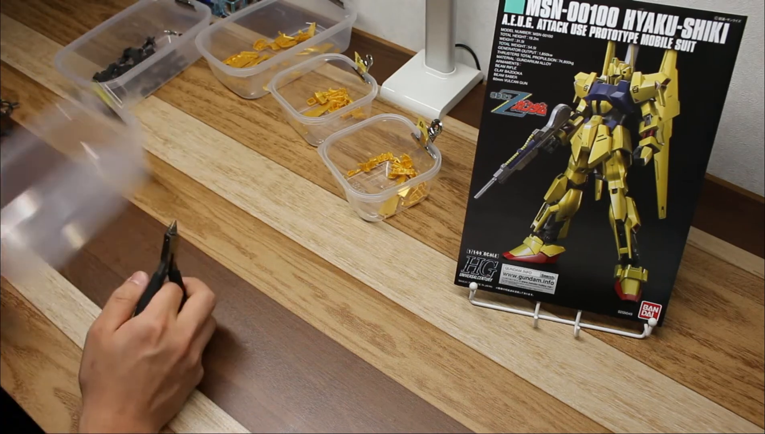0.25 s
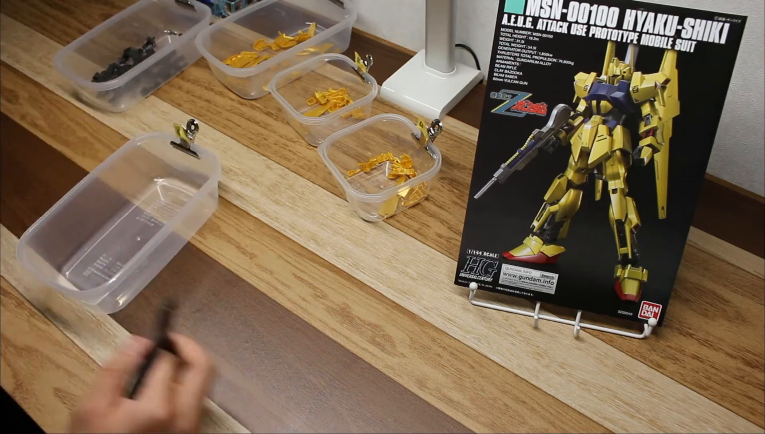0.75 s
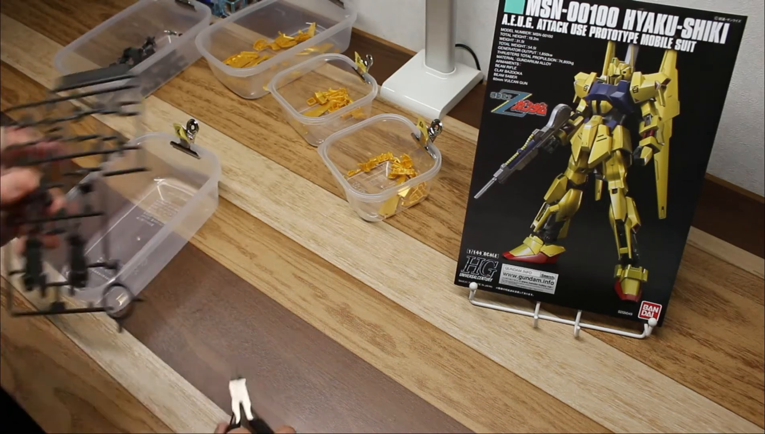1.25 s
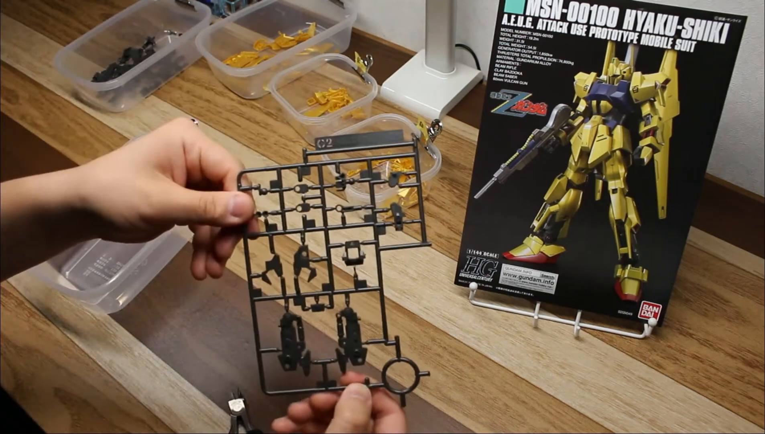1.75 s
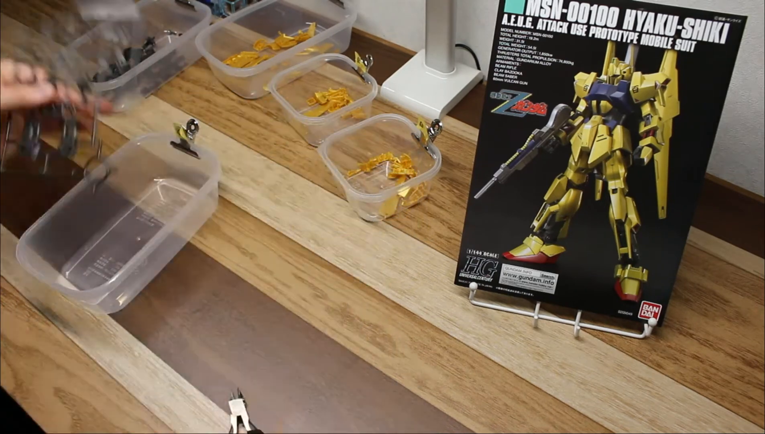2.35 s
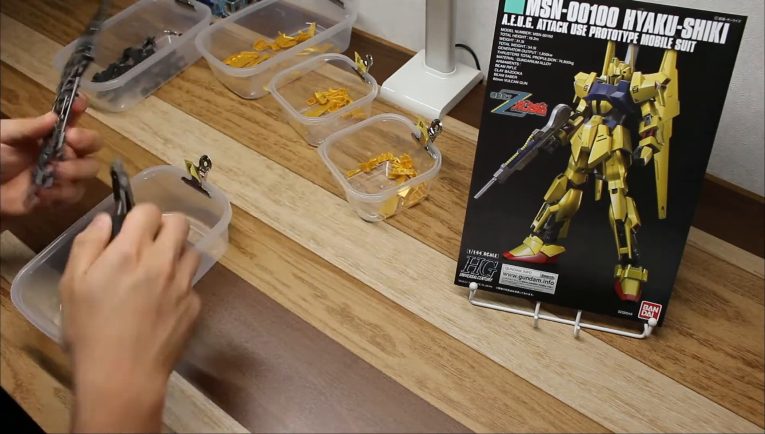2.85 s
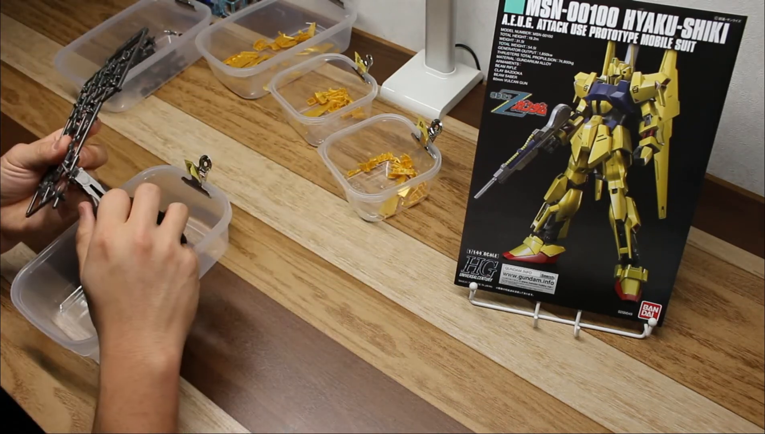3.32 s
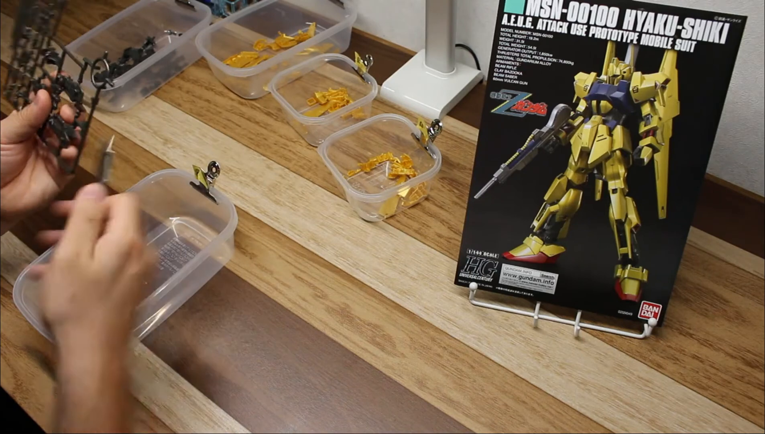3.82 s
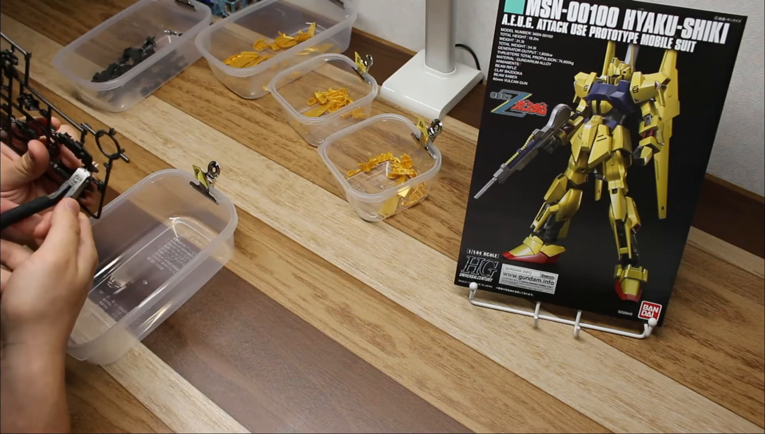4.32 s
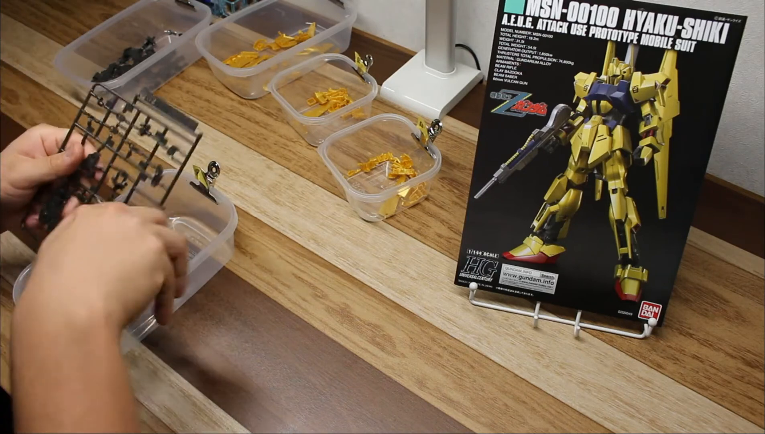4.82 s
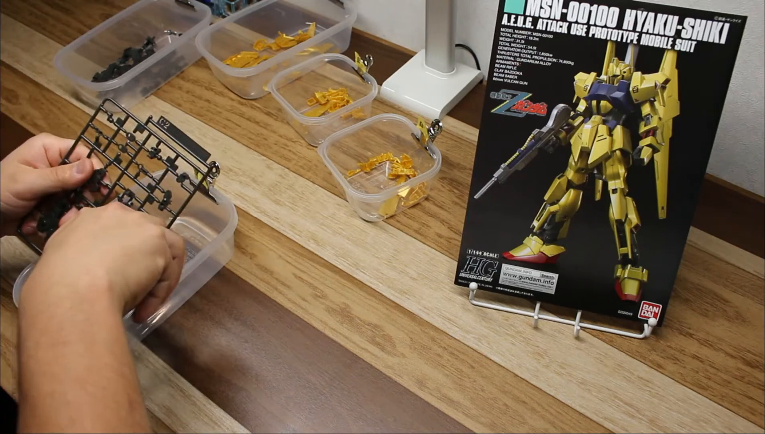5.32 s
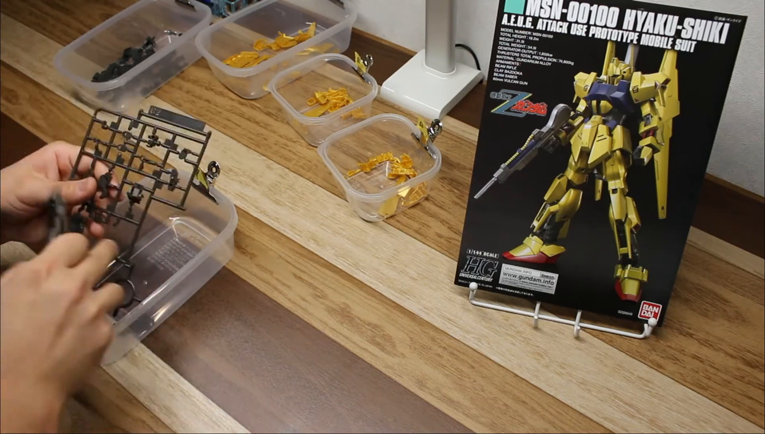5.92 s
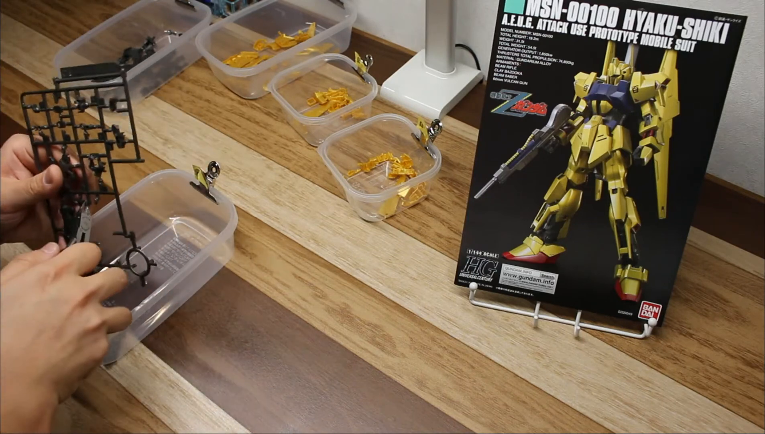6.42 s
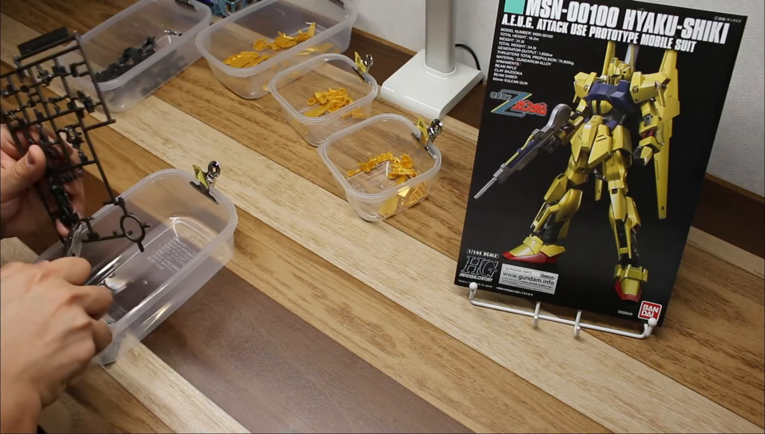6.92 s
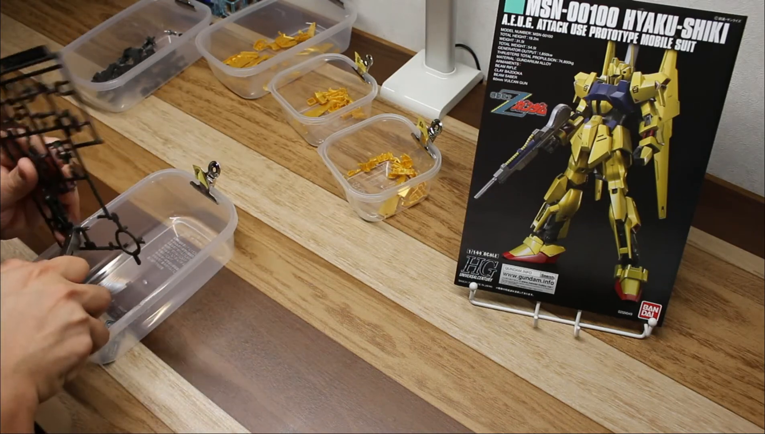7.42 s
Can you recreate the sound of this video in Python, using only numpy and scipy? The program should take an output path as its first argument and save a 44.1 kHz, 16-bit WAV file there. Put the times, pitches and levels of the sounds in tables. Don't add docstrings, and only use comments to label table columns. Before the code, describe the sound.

At a hobby desk, an empty tub bumps and rings briefly, loose plastic pieces chatter, then a loud double knock lands. After a near-silent gap, a metal tool clacks sharply. Quiet handling follows, with dry skin rustles, dull desk thuds and tiny jaw clicks. A light plastic frame strikes hard and drags shortly, before a final clear snip. Close, dry stereo with soft hiss.

```python
import sys
import numpy as np
from scipy import signal
from scipy.fft import rfft, irfft
from scipy.io import wavfile
from scipy.ndimage import uniform_filter1d

SR = 44100
rng = np.random.default_rng(int(sys.argv[2]) if len(sys.argv) > 2 else 0)


def transcribe(signal):
    frames = np.atleast_2d(signal).T
    limited = np.clip(frames, -1, 1)
    pcm = np.round(limited * 32767).astype(np.int16)
    wavfile.write(sys.argv[1], SR, pcm)


def elevation(decibels):
    levels = np.asarray(decibels, float)
    return 10 ** (levels / 20)


N = 337806

# start_s, level_db, hardness_db, fade_s
TUB_BLOWS = [
    (.0855, -20.5, 5.5, 0.014),
    (.4932, -22, 2.5, 0.059),
    (1.1605, -28.5, 1, 0.01),
    (1.196, -27.5, -3.5, 0.014),
    (1.2525, -25, 0.9, 0.016),
    (1.3805, -11, -4.5, 0.035),
    (1.4257, -10, -1.5, 0.026),
    (2.4461, -41, 3, 0.032),
]
TUB_KNOCKS = [(0.071, -25, -3.5, 0.069), (0.088, -43.5, 10, 0.067), (0.417, -20, -0.4, 0.083),
              (0.445, -39, 4, 0.13), (0.505, -21.5, 3, 0.066), (0.688, -38, 8, 0.059),
              (1.372, -35, -1.5, 0.13), (1.388, -40.5, 9, 0.054), (1.419, -22.5, -13.5, 0.13),
              (1.434, -23, -0.1, 0.052), (1.475, -35.5, -10.5, 0.0785), (2.452, -54.5, 6.5, 0.12),
              (2.49, -48.5, 5.5, 0.38), (2.585, -40.5, 6, 0.08), (5.68, -52, 3.5, 0.067),
              (6.86, -54, 4.5, 0.18)]
TUB_TICKS = [(.4145, -26, 0, 0.023), (.4885, -30, 5, 0.021), (.503, -31, 3, 0.019), (0.75, -38.5, 4, .02),
             (1.3832, -13.5, 2, .02), (1.4277, -14, -0.5, 0.024), (0.49, -41, 0, .03), (2.3, -42, -3, .02),
             (.0812, -26, 0, .015), (.0875, -25, 0, .025), (2.455, -43, -2, .04), (2.515, -45, 0, .04),
             (2.565, -40, 2, .02), (1.366, -36, 0, .02)]
PART_RATTLES = [
    (1.125, -37.5, -4, 0.28),
    (1.16, -26.5, -0.8, 0.075),
    (1.195, -24.5, 0.2, 0.086),
    (1.252, -21, 0.4, 0.063),
    (1.543, -56, 6.5, 0.21),
    (1.699, -50, 1.5, 0.067),
]
PART_TICKS = [(.366, -45.5, -3.5, 0.027), (.7075, -39, 0, .012), (1.119, -47, -1, .02),
              (1.1615, -30, 1, .01), (1.1965, -28, 1, .01), (1.2535, -26, 1, .01),
              (1.1305, -39.5, -2, .015), (1.1575, -33, 0, .012), (1.1905, -32.5, -0.5, .012),
              (1.2485, -30, 0.5, .012), (1.275, -39, 2.5, 0.11), (2.5545, -45, 2, .015),
              (2.585, -54, -3, 0.069)]
FRAME_BLOWS = [
    (6.0113, -10, 3.7, 0.017),
    (6.0549, -14, 2.5, 0.02),
    (6.0795, -26, 3, 0.018),
]
FRAME_KNOCKS = [
    (0.76, -40.5, 6.6, 0.05),
    (0.788, -42, 7, 0.02),
    (2.56, -44.5, 7.9, 0.16),
    (2.61, -46.5, 1.1, 0.075),
    (5.995, -31, 0.033, 0.12),
    (6.003, -28.5, 10.5, 0.14),
    (6.017, -23.5, 3.5, 0.025),
    (6.032, -46.5, 20, 0.11),
    (6.063, -32, 5.3, 0.08),
]
FRAME_SCRAPE = [
    (6.075, -30, 11.5, 0.12),
    (6.09, -37, 11.5, 0.054),
    (6.105, -29.5, 1, 0.12),
    (6.12, -30, -1, 0.12),
    (6.14, -43, -11.5, 0.055),
    (6.16, -42, -2, 0.042),
]
FRAME_TICKS = [(.7855, -44, 4, .012), (5.987, -41.5, -7.5, .04), (5.9975, -31.5, -4, .02),
               (6.0015, -31, -2, .015), (6.02, -30, 8, .012), (6.0745, -33, 4, .015),
               (6.1, -33.5, 3.5, .015), (6.0085, -22, -1, .012), (6.066, -36, 6, .05),
               (5.4255, -54, 4, .01), (6.118, -33, -2, .015), (6.13, -35, -2, .015)]
THIN_WALL_KNOCKS = [
    (.42, -29, -3, .05),
    (.502, -30, 4, .06),
    (.747, -48, 4, .04),
    (.757, -40, 2, .04),
    (.766, -38, -1, .045),
    (.786, -42, 7, .018),
    (2.565, -43.5, 1, .08),
    (2.583, -43, 2, .1),
]
TOOL_RATTLES = [
    (0.374, -43, -2, 0.26),
    (0.59, -30.5, 1.4, 0.06),
    (0.654, -32, 1.3, 0.048),
    (0.708, -41.5, -1.5, 0.04),
]
CLACK_BLOWS = [
    (2.2352, -22, 0.1, 0.017),
    (2.24, -20.5, 0.1, 0.011),
]
CLACKS = [
    (2.226, -38, -1.7, 0.13),
    (2.243, -34, -2.1, 0.077),
    (2.316, -52, 9, 0.04),
]
PICKUPS = [
    (2.899, -44.5, 2.5, 0.044),
    (3.576, -43.5, 0.5, 0.093),
    (3.595, -66, -6, 0.092),
]
SNIPS = [
    (0.0779, -36, -2, 0.022),
    (0.9946, -37, 11, 0.014),
    (2.4807, -44.5, -6, 0.0099),
    (4.5662, -28.5, 2, 0.013),
    (5.0333, -53.5, -9.5, 0.017),
    (5.428, -47, -8.5, 0.011),
    (5.9781, -42, 8.5, 0.014),
    (7.4371, -25, 1.5, 0.013),
    (7.5095, -51.5, 6, 0.028),
]
# start_s, level_db, hardness_db
SQUEEZES = [
    (0.997, -47.5, 0.5),
    (4.557, -47, 0),
    (4.571, -48, 1),
    (5.036, -66, -10),
    (5.43, -60, -8.5),
    (5.98, -54, -0.5),
    (7.429, -44, 5),
    (7.442, -44.5, 4.5),
]
# start_s, level_db, hardness_db
BRUSHES = [(1.053, -51, 2.5), (2.196, -59.5, 0), (2.548, -51, -2), (2.697, -57.5, 3), (2.787, -54.5, 0.5),
           (2.856, -49.5, 2), (2.877, -55, 0), (3.039, -61, -1.3), (3.724, -57, -2.5), (3.82, -63, -1),
           (4.769, -53.5, 1.6), (4.857, -59, -0.6), (5.222, -67, -1.5), (5.499, -73.5, -3),
           (5.612, -67, -1.5), (5.962, -52.5, 1), (6.836, -55, 0), (7.1, -66.5, -2), (7.535, -55.5, -0.5)]
# start_s, level_db, pitch_hz, fade_s
THUDS = [(0.08, -31, 168, 0.038), (0.415, -27, 126, 0.11), (0.496, -32, 143, 0.09),
         (0.682, -36.5, 61.9, 0.041), (1.157, -40.5, 130, 0.16), (1.248, -34.5, 158, 0.03),
         (1.385, -29, 124, 0.1), (1.425, -28.5, 110, 0.13), (2.231, -39.5, 148, 0.075),
         (2.448, -40, 230, 0.082), (2.567, -38.5, 128, 0.17), (2.896, -42.5, 71.6, 0.055),
         (3.575, -51.5, 62.5, 0.15), (3.72, -40.5, 126, 0.094), (3.742, -38.5, 76, 0.1),
         (4.567, -54, 87.4, 0.11), (5.68, -53.5, 110, 0.11), (6.011, -36.5, 50, 0.024),
         (6.859, -53.5, 139.7, 0.1)]

# pitch_hz, width_hz, level_db
TUB = [(280, 45, -9), (385, 53.7, 2.5), (482, 84, -2), (639.7, 76, -4.5), (753, 45, -5), (948, 50, -4),
       (1172, 50, -13.5), (1400, 110, -12), (2030, 290, -20), (3150, 500, -23), (5124, 640, -28),
       (7400, 1500, -30)]
LOOSE_PARTS = [(580, 78, -14), (1077, 78, -10), (1600, 170, -3.5), (1816, 100, -0.5), (3120, 1400, -12),
               (3460, 24, 3), (3107, 35, -4.5), (4950, 97, -0.5), (5480, 300, -9.5), (7690, 380, -5.5),
               (9090, 300, -11.5), (12020, 6100, -28)]
FRAME = [(498, 160, -13.5), (1056, 180, -3.5), (1236, 120, 0.5), (1690, 310, 10), (3070, 1120, -4),
         (3115, 150, -14), (1972, 250, -1), (5120, 630, -4), (5780, 290, -6.5), (6670, 760, -13.5),
         (8356, 960, -20), (11700, 6000, -17)]
THIN_WALL = [(927, 130, -1), (1500, 200, -3), (1900, 160, -5), (2760, 90, -5), (5250, 250, -11),
             (7000, 900, -15)]
TOOL = [(307, 260, -13.5), (646, 180, -1.5), (1860, 280, 3.5), (4410, 120, 2.5), (5850, 520, -7),
        (7740, 590, -2.5), (10800, 5500, -10)]
TRAY = [(326, 93, -4), (598, 110, 3.5), (1730, 250, 7.5), (3400, 420, -1.5), (4080, 210, -2.5),
        (4960, 160, 2), (5650, 170, -5), (8800, 440, -21)]
HANDLES = [(358, 310, -19), (2047, 236, -5.5), (4290, 290, -7.5), (4960, 330, -5), (7060, 510, -7.5),
           (8070, 240, 2.5), (12300, 2900, -7)]
JAWS = [(500, 500, -6), (1687, 540, -1), (2152, 270, 3), (3000, 950, -0.5), (4140, 540, 1.5),
        (5340, 380, 8), (6820, 350, 2.5), (8180, 980, -0.5), (10555, 500, -11), (11570, 200, 0),
        (14240, 1100, -19.5)]
SKIN = [(360, 690, 9), (780, 980, 10.5), (2010, 510, 16), (4772, 1400, 11), (7610, 3600, 1.5),
        (11430, 1774, 9.5), (13620, 9700, -2)]

RANGE_EDGES_HZ = [150, 1300, 2800, 6500, 20000]
TUB_LIFT = (0, 1.049, 2.049, 3.001)
PARTS_LIFT = (-2, -0.9, -0.11, 1.37)
FRAME_LIFT = (0.66, 0, 1.01, 1.16)
# level_db at hardness 0 in each range low to top, then its lift as above
TUB_BLOW_TONE = ((1, -17, -25.5, -29.5), TUB_LIFT)
TUB_TONE = ((-1, -10.5, -19, -29), TUB_LIFT)
RATTLE_TONE = ((-3.5, -3.5, 0, -10.5), PARTS_LIFT)
FRAME_BLOW_TONE = ((-8, -0.5, -6.5, -11.5), FRAME_LIFT)
FRAME_TONE = ((-6.5, -0.5, -10.5, -15), FRAME_LIFT)
SCRAPE_TONE = ((-10, 0, -10.5, -18), (-0.24, 0, 1.06, 1.5))
TOOL_TONE = ((-4.5, -5, -1, -13.5), PARTS_LIFT)
CLACK_BLOW_TONE = ((1, -7, -1.5, -21), PARTS_LIFT)
CLACK_TONE = ((-5.5, -9, 2, -13.5), PARTS_LIFT)
PICKUP_TONE = ((-7, 0.8, 0, -5.5), PARTS_LIFT)
JAW_TONE = ((-16.5, -6, 0.0052, 0.1), (-1.5, -0.82, 0.00067, 0.58))
SQUEEZE_TONE = ((-15.5, -8.5, -0.5, 0), JAW_TONE[1])
SKIN_TONE = ((-4, -6.5, -4.5, 0.0011), (-4.5, -1.5, -0.9, 0.0032))

# start_s, level_db
BUSY = [(0, -35), (.1, -34), (.22, -50), (.33, -49.5), (.5, -46), (.76, -43), (.87, -68), (1.19, -48),
        (1.381, -61.5), (2.201, -65.5), (2.69, -54.5), (3.43, -72.5), (3.73, -61), (4.97, -76), (5.89, -79),
        (6.119, -68), (7.3, -76.5), (7.66, -61)]
# start_s, level_db
LEAN = [(0, -41), (.2, -69), (.87, -75), (1.02, -56), (1.38, -61), (2.15, -78.5), (2.69, -57.5),
        (3.05, -63), (3.45, -77.5), (3.75, -60), (4.18, -55.5), (4.5, -55.5), (4.97, -75), (7.66, -79.5)]
# pitch_hz, level_db
RUSTLE = [(880, -36), (1500, -5.5), (5220, -3.5), (13900, -14), (16000, -14)]
# pitch_hz, level_db
HISS = [(20, -5.5), (77, -16), (127, -6), (172, -12), (337, -10), (420, -13.5), (10800, -22.5),
        (16000, -23)]
# pitch_hz, likeness (0 to 1)
SAME = [(60, 0.21), (240, 0.23), (950, 0.1), (3770, 0.025), (15000, 0.034)]
# pitch_hz, level_db
WIDTH = [(40, -12.5), (90, -15.5), (180, -27), (360, -33.5), (700, -21), (1400, -13), (6000, -9.5),
         (15000, -7.5)]


def contacts(rows, modes, tone, blow_db, lead, slips_per_s, top_fades, between_db=-24, tick_hz=8500,
             low_hz=91, spread=0.012, alternate=True):
    out = np.zeros(N)
    for s, strength_db, hardness, fade_s in rows:
        levels_db = strength_db + np.array(tone[0]) + hardness * np.array(tone[1])
        t, shape = swell(fade_s, lead)
        chance = rng.random((3, len(t)))
        sizes = elevation(-2.0 * np.log(chance[0] + 0.011)) * np.sign(chance[1] - .5)
        slips = sizes * (chance[2] < slips_per_s / SR)
        drive = shape * evened(slips)
        drive[np.searchsorted(t, 0)] -= elevation(blow_db)
        detune = rng.normal(1, spread, len(modes))
        body = np.zeros(len(t))
        for k, (hz, width, db) in enumerate(modes):
            sign = (-1) ** k if alternate else -1
            body += sign * elevation(db) * ring(drive, hz * detune[k], width)
        body = band(body + elevation(between_db) * drive, low_hz, tick_hz)
        for k, (db, part) in enumerate(zip(levels_db, ranges(body))):
            sooner = elevation(-k * top_fades * np.maximum(t, 0) / fade_s)
            part = part * sooner
            size = np.linalg.norm(shape * sooner) / np.linalg.norm(part)
            add(out, s + t[0], elevation(db) * part * size)
    return out


def tub():
    blows = contacts(TUB_BLOWS, TUB, TUB_BLOW_TONE, blow_db=27.5, lead=0.0025, slips_per_s=2400,
                     top_fades=7, between_db=-36, spread=.004, alternate=False)
    knocks = contacts(TUB_KNOCKS, TUB, TUB_TONE, blow_db=-6, lead=0.027, slips_per_s=2800,
                      top_fades=9.8, between_db=-38, spread=.006)
    ticks = contacts(TUB_TICKS, TUB, TUB_BLOW_TONE, blow_db=22, lead=0.0015, slips_per_s=3100,
                     top_fades=5, between_db=-29.5, spread=0.00397, alternate=False)
    return blows + knocks + ticks


def loose_parts():
    rattles = contacts(PART_RATTLES, LOOSE_PARTS, RATTLE_TONE, blow_db=17, lead=0.008, slips_per_s=6700,
                       top_fades=3.2, between_db=-18, spread=.003)
    ticks = contacts(PART_TICKS, LOOSE_PARTS, RATTLE_TONE, blow_db=14, lead=0.002, slips_per_s=5970,
                     top_fades=2.5, between_db=-14, spread=0.0041)
    return rattles + ticks


def parts_frame():
    blows = contacts(FRAME_BLOWS, FRAME, FRAME_BLOW_TONE, blow_db=20, lead=0.00092, slips_per_s=5400,
                     top_fades=5.9, between_db=-19.5, low_hz=400)
    knocks = contacts(FRAME_KNOCKS, FRAME, FRAME_TONE, blow_db=-5, lead=0.014, slips_per_s=4400,
                      top_fades=1.7, between_db=-26, low_hz=400)
    scrape = contacts(FRAME_SCRAPE, FRAME, SCRAPE_TONE, blow_db=-5, lead=0.01, slips_per_s=5000,
                      top_fades=2.4, low_hz=400)
    ticks = contacts(FRAME_TICKS, FRAME, FRAME_TONE, blow_db=11, lead=0.0024, slips_per_s=3800,
                     top_fades=2.5, between_db=-17, low_hz=400)
    wall_tone = ((-1, -4, -12.5, -17), FRAME_LIFT)
    wall = contacts(THIN_WALL_KNOCKS, THIN_WALL, wall_tone, blow_db=6, lead=0.0091, slips_per_s=4000,
                    top_fades=3, between_db=-23, low_hz=300)
    return blows + knocks + scrape + ticks + wall


def nippers():
    rattles = contacts(TOOL_RATTLES, TOOL, TOOL_TONE, blow_db=-2, lead=0.018, slips_per_s=6000,
                       top_fades=2.9)
    clack_blows = contacts(CLACK_BLOWS, TRAY, CLACK_BLOW_TONE, blow_db=18.5, lead=0.00084,
                           slips_per_s=2100, top_fades=2.7, between_db=-42)
    clacks = contacts(CLACKS, TRAY, CLACK_TONE, blow_db=-8, lead=0.015, slips_per_s=6000,
                      top_fades=1.8, between_db=-28)
    pickups = contacts(PICKUPS, HANDLES, PICKUP_TONE, blow_db=18.5, lead=0.021, slips_per_s=4600,
                       top_fades=3.2)
    return rattles + clack_blows + clacks + pickups


def snipping():
    snips = contacts(SNIPS, JAWS, JAW_TONE, blow_db=11, lead=0.00066, slips_per_s=5000,
                     top_fades=2.3, between_db=-11.5, tick_hz=16900)
    squeeze_rows = [(*row, 0.074) for row in SQUEEZES]
    squeezes = contacts(squeeze_rows, JAWS, SQUEEZE_TONE, blow_db=-9.5, lead=0.021, slips_per_s=8700,
                        top_fades=2.5, between_db=-20.5, tick_hz=15100)
    return snips + squeezes


def finger_brushes():
    rows = [(*row, 0.096) for row in BRUSHES]
    return contacts(rows, SKIN, SKIN_TONE, blow_db=-6, lead=0.0091, slips_per_s=6400,
                    top_fades=0.97, between_db=-6.5, tick_hz=17000)


def desk_thuds():
    out = np.zeros(N)
    for s, db, hz, fade_s in THUDS:
        t, shape = swell(fade_s, 0.0056)
        push = shape * rng.standard_normal(len(t))
        wobble = ring(push, hz, 44) + 0.51 * ring(push, 0.51 * hz, 30)
        add(out, s + t[0], elevation(db) * peaked(band(wobble, 55, 380)))
    return out


def handling():
    t = np.arange(N) / SR
    sway_db = np.interp(t, *np.transpose(LEAN))
    busy_db = np.interp(t, *np.transpose(BUSY))
    extra_db = busy_db + 60
    noise = rng.standard_normal((5, N))
    slow = uniform_filter1d(uniform_filter1d(noise[4], size=600), size=600)
    lumps = elevation(2.8 * evened(slow))
    sway = elevation(sway_db) * evened(ring(ring(noise[0], 28, 9), 28, 9))
    rumble = evened(band(noise[1], 40, 160)) * elevation(-64.5 + 0.42 * extra_db)
    rub = evened(lumps * band(noise[2], 130, 1500)) * elevation(-68.5 + 0.9 * extra_db)
    grain = coloured(band(noise[3], 1500, 17000), RUSTLE)
    rustle = evened(lumps * grain) * elevation(-11.5 + busy_db)
    return sway + rumble + rub + rustle


def hiss():
    hz = np.fft.rfftfreq(N, 1 / SR)
    left, other = rfft(rng.standard_normal((2, N)))
    same = np.clip(read(SAME, hz), 0, 1)
    right = same * left + np.sqrt(1 - same ** 2) * other
    pair = np.array([left, right]) * elevation(read(HISS, hz))
    return elevation(-59.5) * evened(irfft(pair, N))


def widen(x):
    taps = rng.standard_normal(150) * elevation(-60 * np.arange(150) / SR / .006)
    odd = np.concatenate([-taps[::-1], [0], taps])
    late = rng.standard_normal(3000) * elevation(-60 * np.arange(3000) / SR / 0.062)
    centred = np.roll(np.pad(odd, (0, N - len(odd))), -len(taps))
    paths = rfft(centred) / np.linalg.norm(odd)
    paths = paths + elevation(0.5) * rfft(late, N) / np.linalg.norm(late)
    paths = paths / np.sqrt(uniform_filter1d(abs(paths) ** 2, size=2500))
    side = coloured(irfft(rfft(x) * paths, N), WIDTH)
    return np.array([x + side, x - side])


def swell(fade_s, lead):
    t = np.arange(-.05, .25, 1 / SR)
    rise = np.clip(1 + t / np.clip(lead, .001, .05), 0, 1) ** 2
    after = np.maximum(t, 0) / max(fade_s, .01)
    return t, rise * elevation(-35 * after - 21 * after ** 2)


def ring(x, hz, width):
    r = np.exp(-np.pi * max(width, 5) / SR)
    return signal.lfilter([1 - r, 0, r - 1], [1, -2 * r * np.cos(2 * np.pi * hz / SR), r * r], x)


def ranges(x):
    hz = np.fft.rfftfreq(len(x), 1 / SR)
    above = [np.clip(.5 + 4 * np.log((hz + 1) / edge), 0, 1) for edge in RANGE_EDGES_HZ]
    return irfft(rfft(x) * -np.diff(above, axis=0), len(x))


def band(x, lo_hz, hi_hz):
    sos = signal.butter(2, [lo_hz, min(hi_hz, .45 * SR)], "band", fs=SR, output="sos")
    return signal.sosfilt(sos, x)


def read(points, hz):
    f, value = np.transpose(points)
    return np.interp(np.log(hz + 1), np.log(f + 1), value)


def coloured(x, points):
    size = x.shape[-1]
    return irfft(rfft(x) * elevation(read(points, np.fft.rfftfreq(size, 1 / SR))), size)


def evened(x):
    return x / np.sqrt(np.mean(x ** 2) + 1e-20)


def peaked(x):
    return x / np.sqrt(uniform_filter1d(x ** 2, size=176).max() + 1e-20)


def add(mix, s, sound):
    at = round(s * SR)
    part = mix[max(at, 0):][:len(sound) + min(at, 0)]
    part += sound[max(-at, 0):][:len(part)]


def scene():
    near = tub() + loose_parts() + parts_frame() + nippers() + snipping()
    near += finger_brushes() + desk_thuds() + handling()
    return widen(near) + hiss()


def low_pass(x):
    return signal.sosfilt(signal.butter(12, 16510, fs=SR, output="sos"), x)


def record(dry):
    mid, side = (dry[0] + dry[1]) / 2, (dry[0] - dry[1]) / 2
    loud_db = 10 * np.log10(abs(uniform_filter1d(mid ** 2, size=900)) + 1e-12)
    side = side * elevation(-0.25 * np.maximum(loud_db + 30.5, 0))
    pair = np.clip([mid + side, mid - side], -.99, .99)
    edge = signal.firwin(511, 15780, window=("kaiser", 7), fs=SR)
    mix = signal.oaconvolve(pair, edge[None], "same")
    return low_pass(mix)


dry = scene()
out = record(dry)
transcribe(out)
```